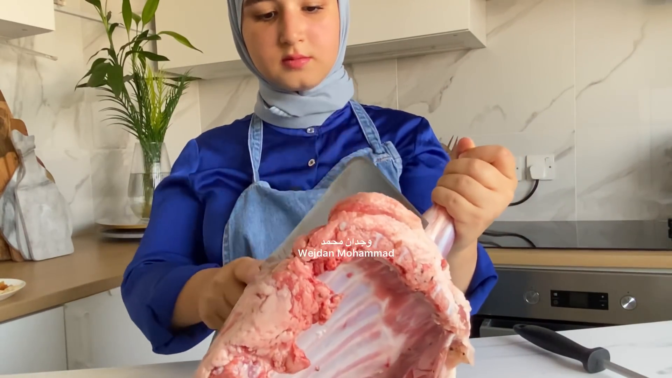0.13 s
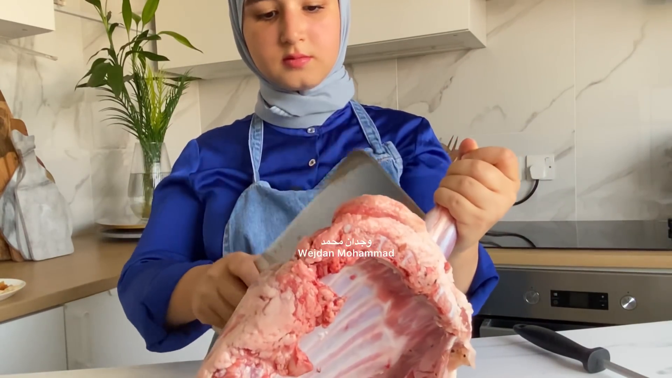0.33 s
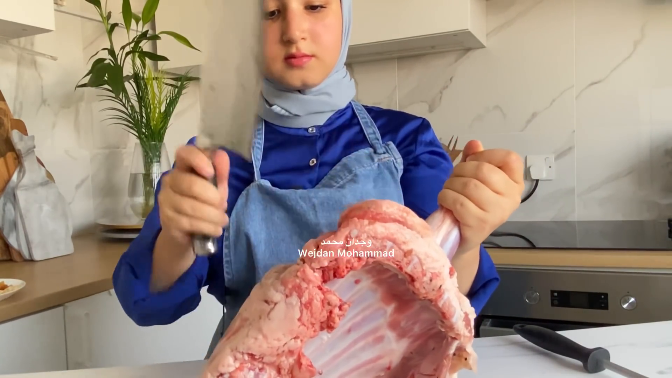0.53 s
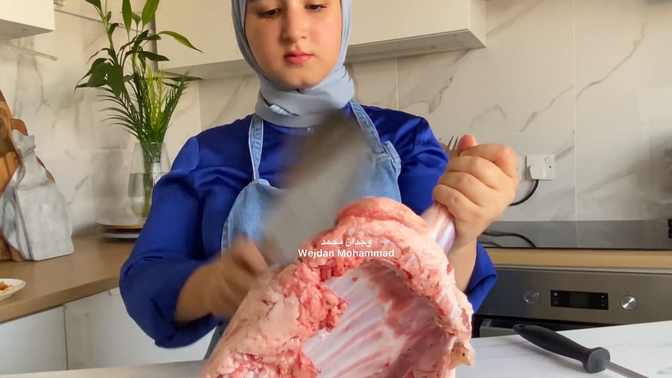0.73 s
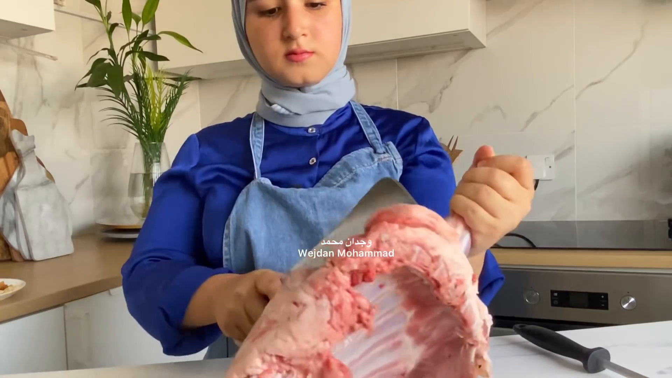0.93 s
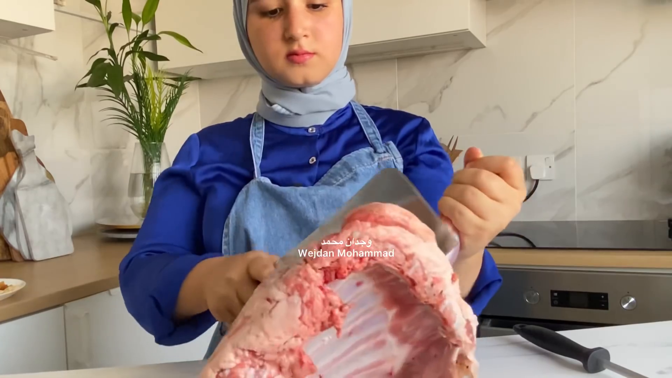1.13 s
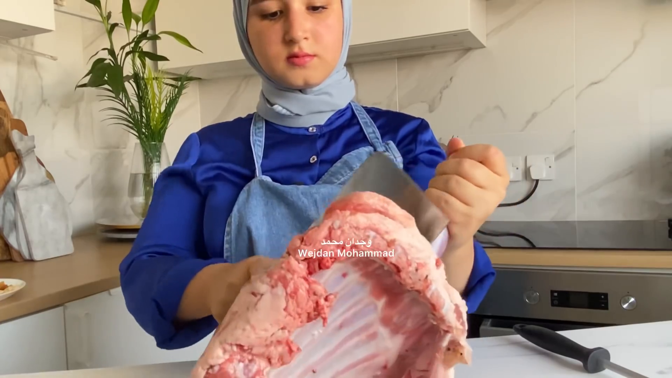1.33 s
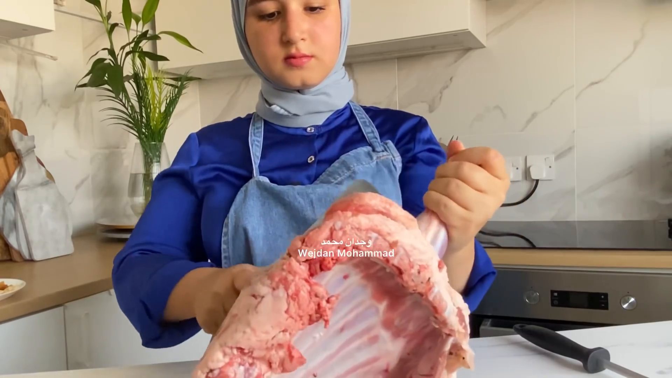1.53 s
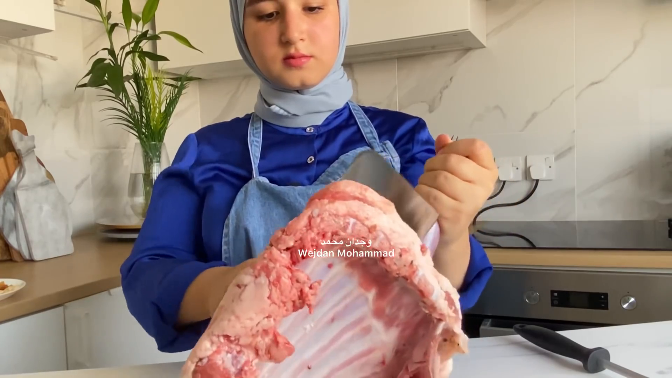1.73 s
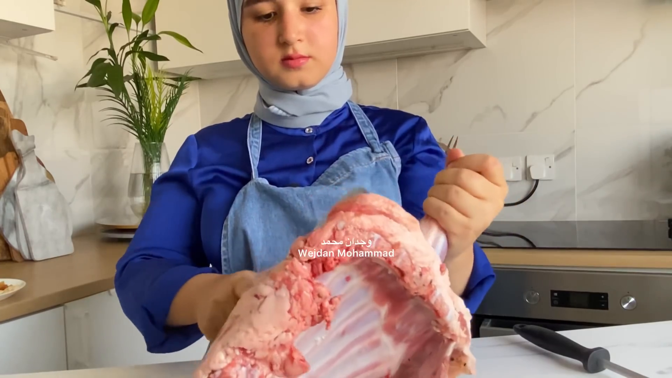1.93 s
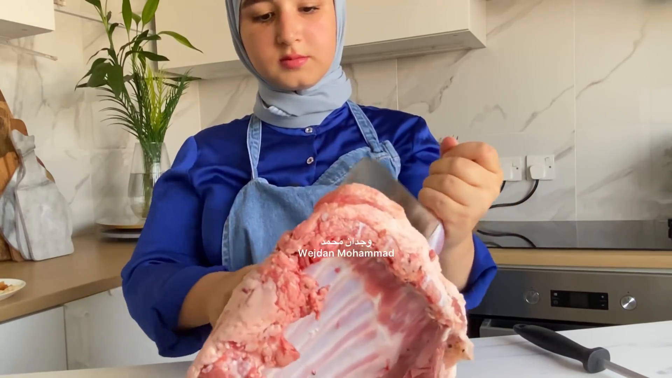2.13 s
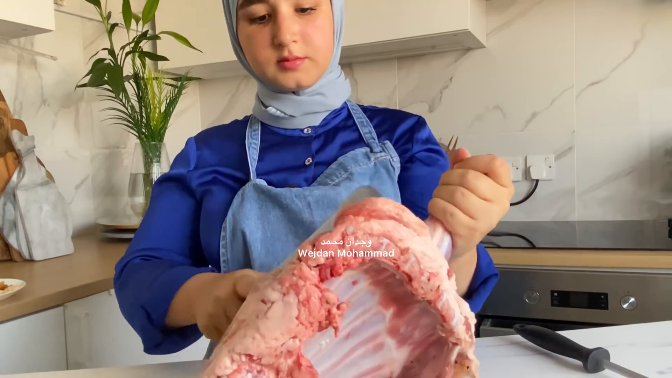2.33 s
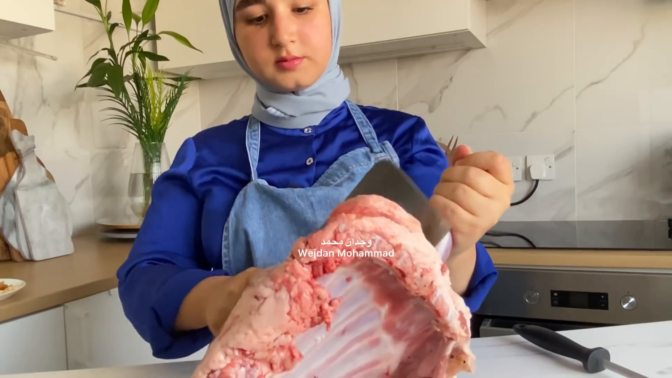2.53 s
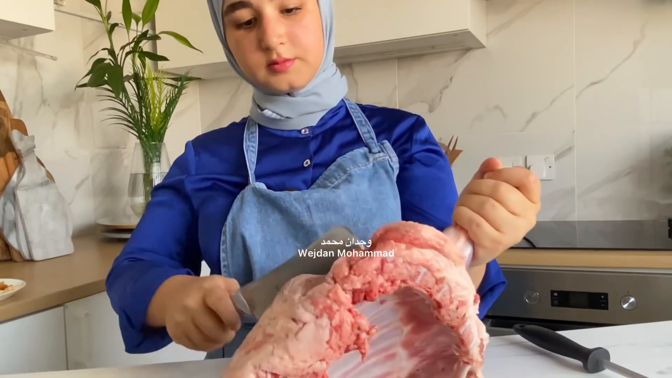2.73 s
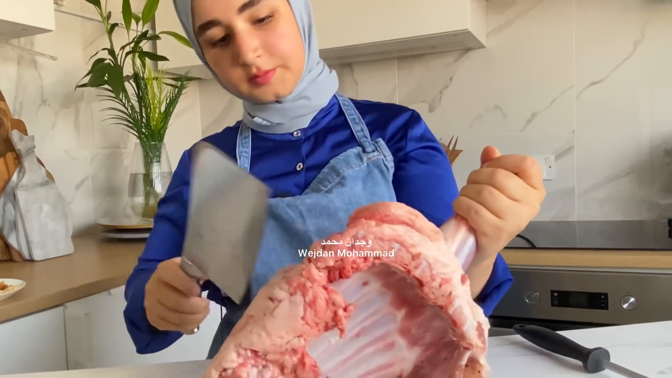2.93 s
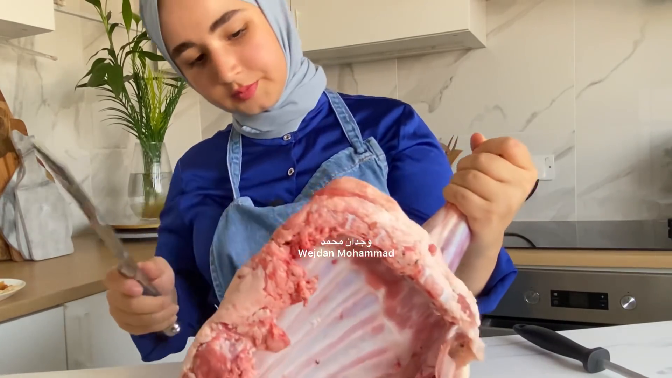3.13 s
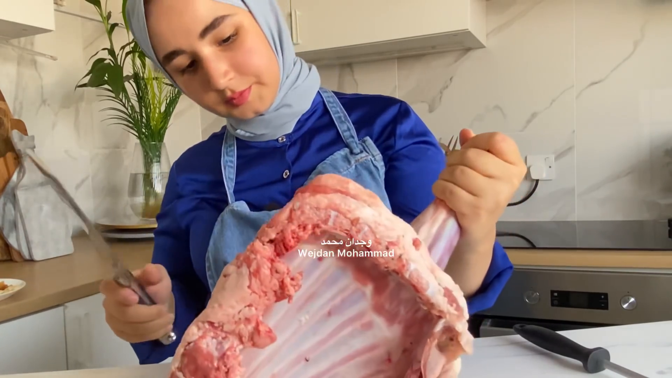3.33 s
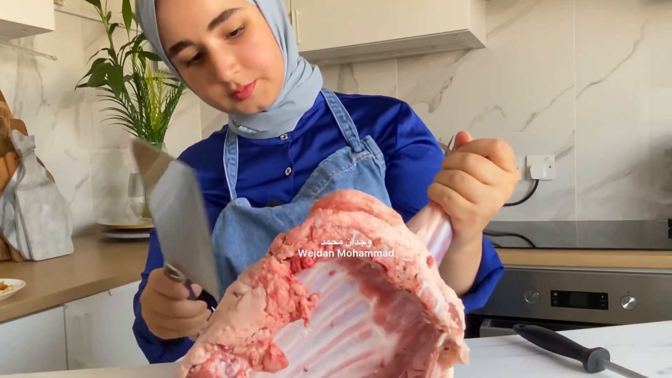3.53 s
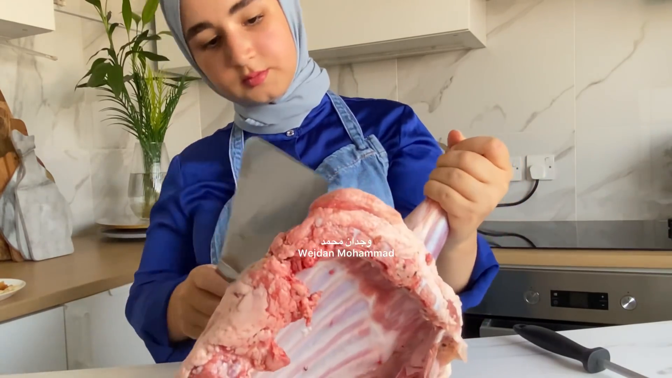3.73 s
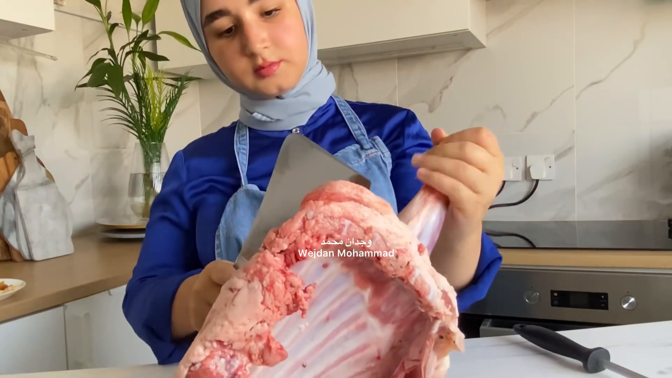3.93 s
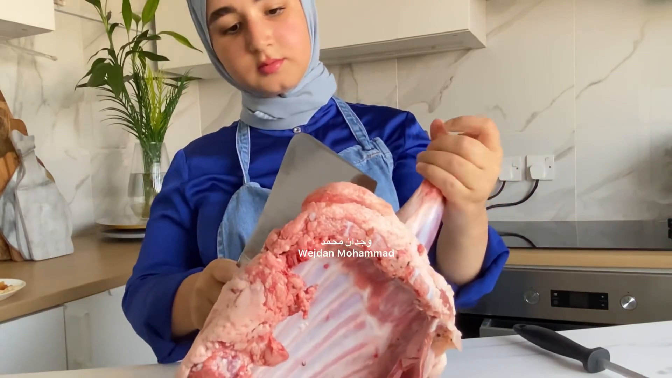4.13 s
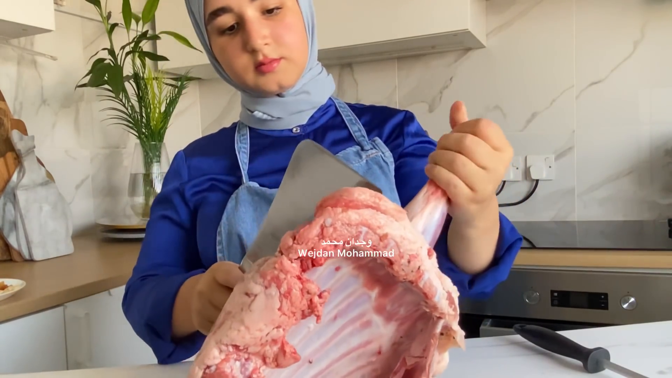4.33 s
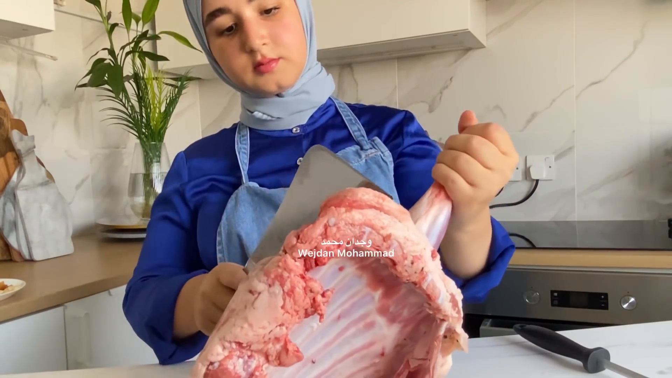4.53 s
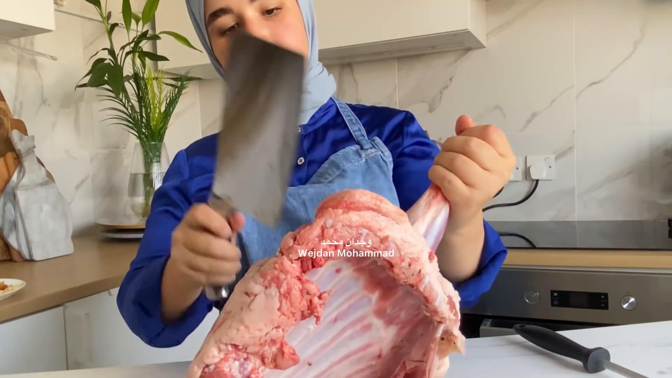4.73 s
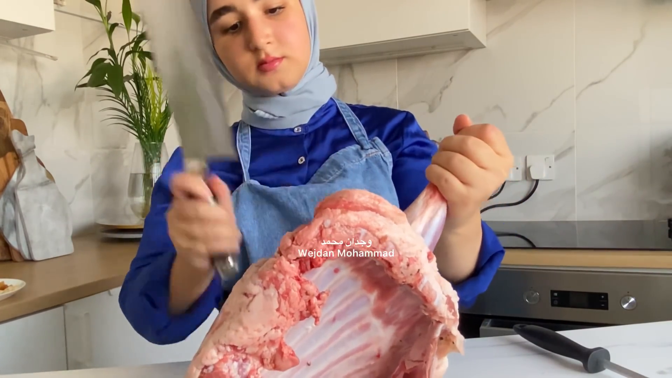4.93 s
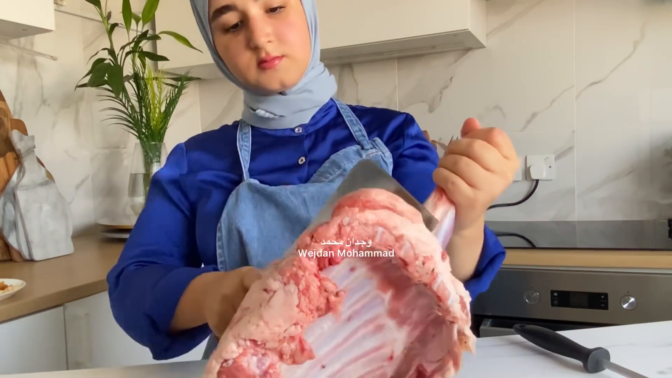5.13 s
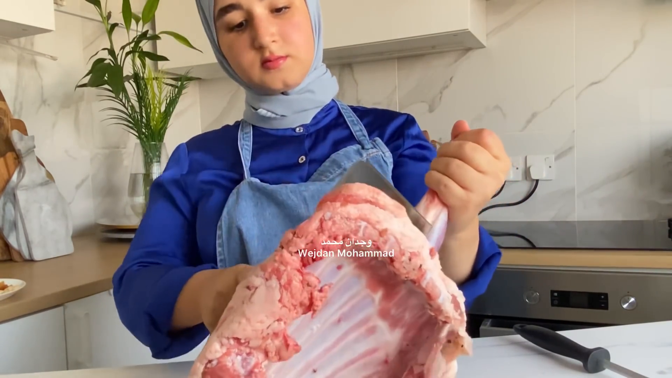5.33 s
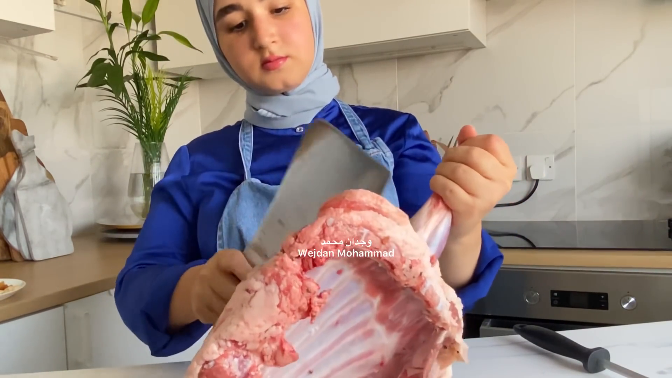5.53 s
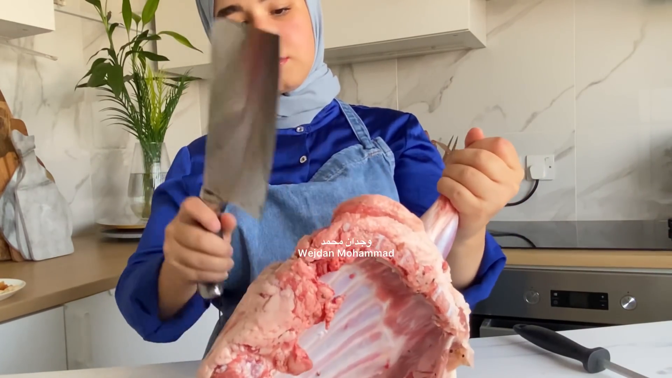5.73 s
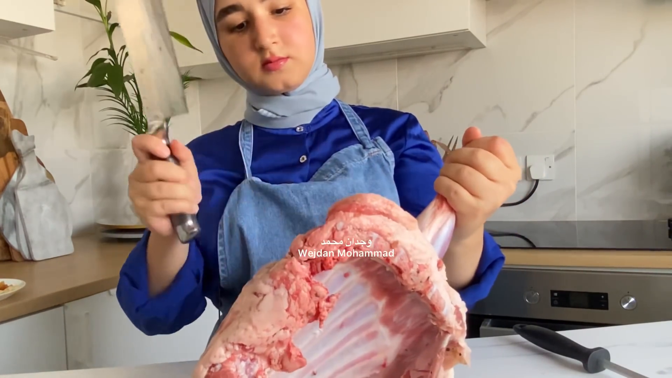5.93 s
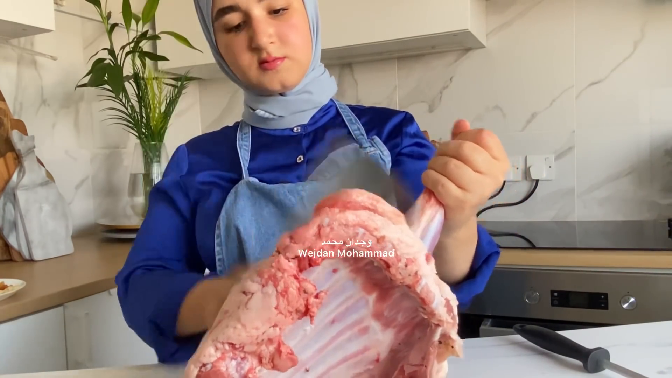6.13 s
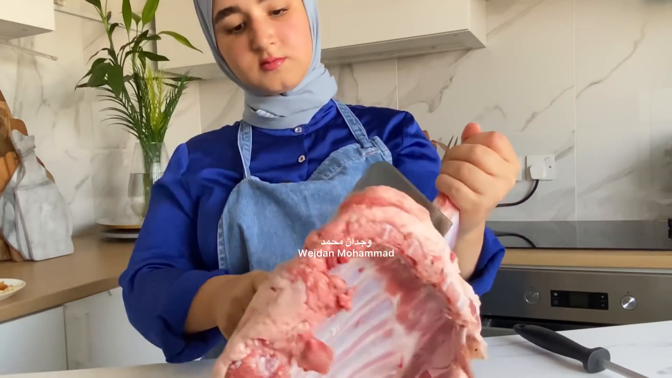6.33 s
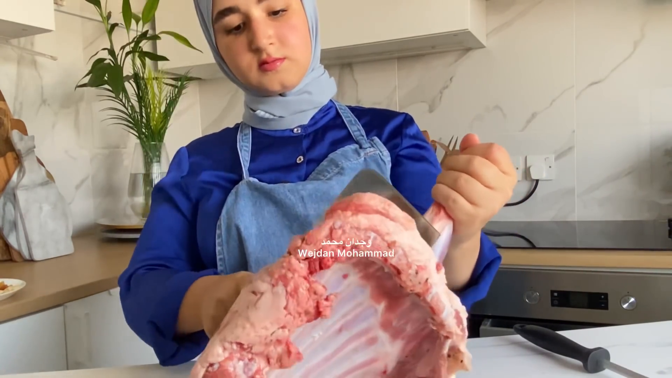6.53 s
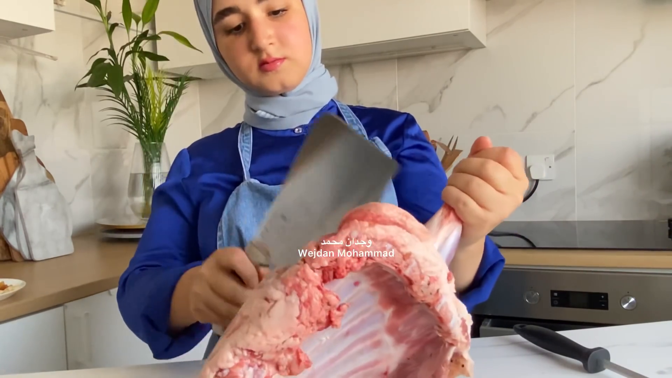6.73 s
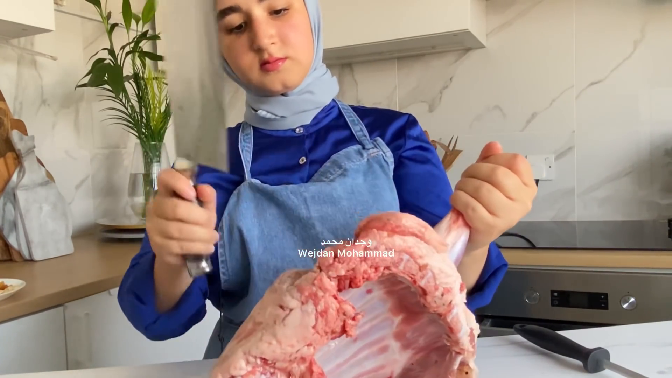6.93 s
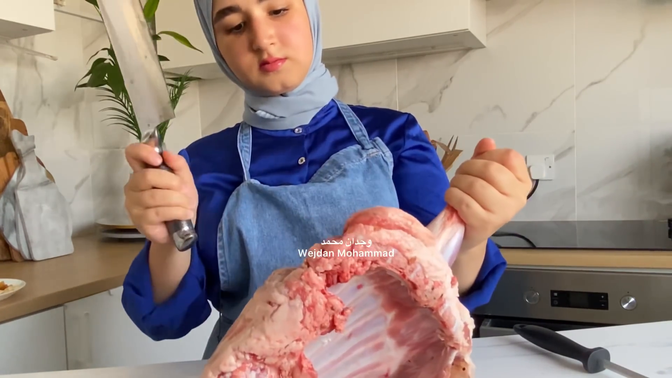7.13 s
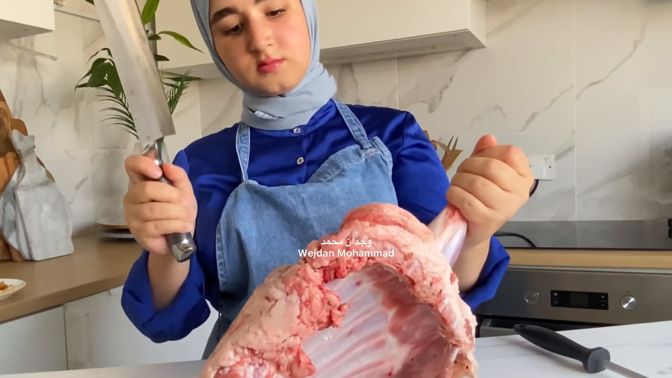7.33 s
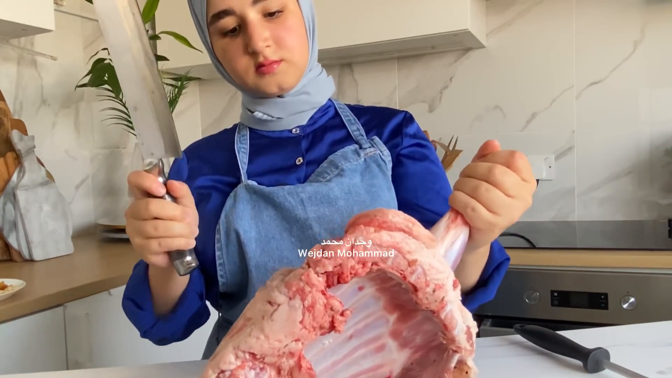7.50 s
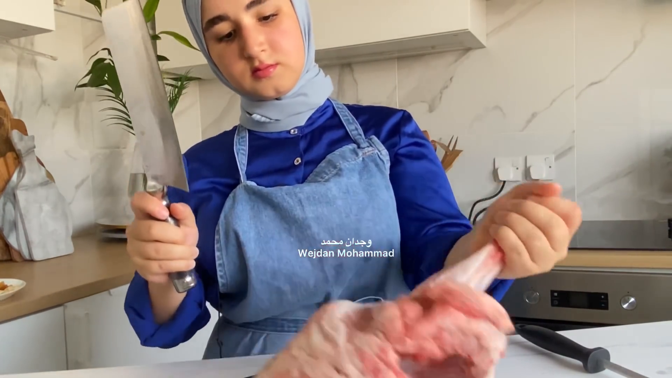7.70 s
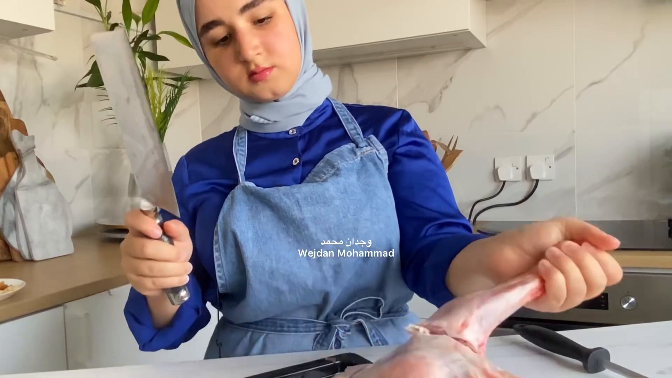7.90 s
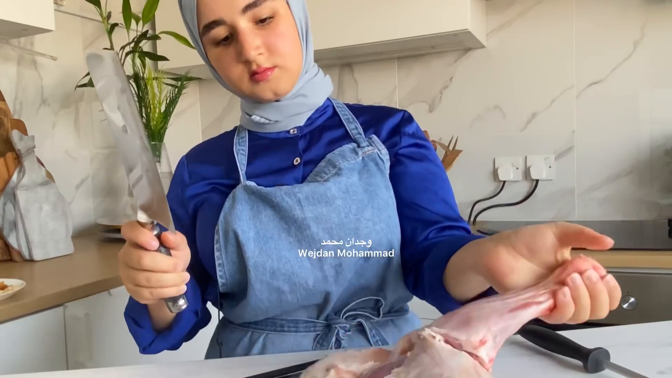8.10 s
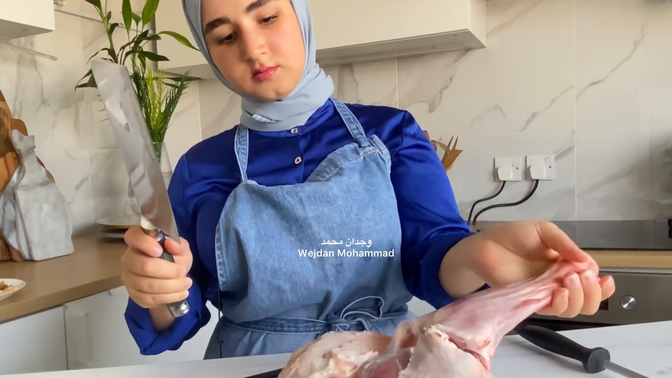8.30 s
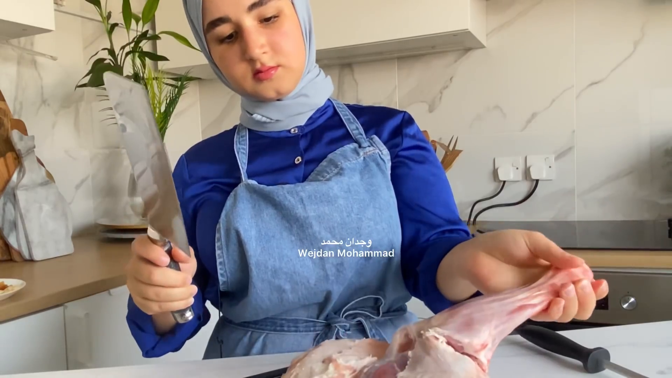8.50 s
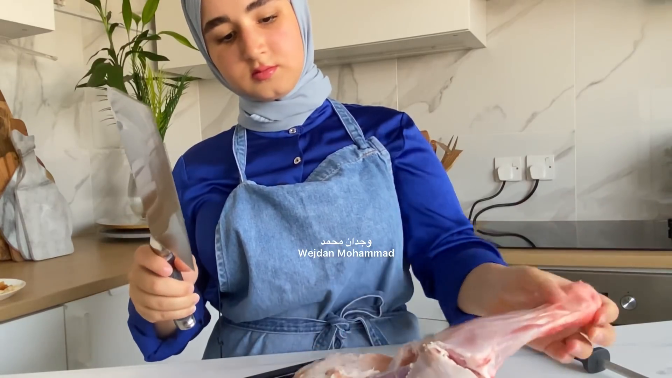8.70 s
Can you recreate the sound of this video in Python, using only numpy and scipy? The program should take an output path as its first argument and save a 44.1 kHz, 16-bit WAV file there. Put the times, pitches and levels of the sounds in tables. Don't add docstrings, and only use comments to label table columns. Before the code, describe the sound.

Close, overloaded chopping: one very loud crunch of blade into bone, with a hollow board slap and low boom, then several seconds of faint blade scraping and moist meat movement. Two harder, splintering chops follow, the last with a brighter metallic ring. Soft sticky ticks and sliding meat end the scene. A fridge hum, thin hiss and low rumble continue throughout, with short reflections from hard kitchen walls.

```python
import sys
import numpy as np
from scipy import signal
from scipy.fft import rfft, irfft
from scipy.io import wavfile
from scipy.ndimage import uniform_filter1d

SR = 44100
rng = np.random.default_rng(int(sys.argv[2]) if len(sys.argv) > 2 else 0)


def level_to_linear(level):
    exponent = np.asarray(level, float) / 20
    return 10 ** exponent


def to_wav(sig):
    pcm = np.clip(np.atleast_2d(sig), -1, 1) * 32767
    pcm = np.round(pcm).astype(np.int16)
    wavfile.write(sys.argv[1], SR, pcm.T)


N = 386302


def at_hz(points, hz):
    table_hz, value = np.array(points).T
    return np.interp(np.log(hz + 1), np.log(table_hz), value)


def in_time(rows, column):
    rows = np.array(rows)
    return np.interp(np.arange(N) / SR, rows[:, 0], rows[:, column], left=-120, right=-120)


def rms_one(x):
    return x / np.sqrt(np.mean(x ** 2) + 1e-20)


def energy_one(x):
    return x / np.sqrt(np.sum(x ** 2))


def band(x, low_hz, high_hz):
    sos = signal.butter(2, [low_hz, min(high_hz, SR * .45)], "band", fs=SR, output="sos")
    return signal.sosfilt(sos, x)


def dying(count, t60):
    return level_to_linear(-60 * np.arange(count) / SR / t60)


def add(out, s, sound):
    at = round(s * SR)
    out[at:at + len(sound)] += sound[:N - at]


def coloured(spectrum, count):
    hz = np.fft.rfftfreq(count, 1 / SR)
    white = rng.standard_normal(count)
    return rms_one(irfft(rfft(white) * level_to_linear(at_hz(spectrum, hz)), count))


def wander(low_hz, high_hz):
    return rms_one(band(rng.standard_normal(N + SR), low_hz, high_hz)[SR:])


def grains(per_s, spread_db):
    sizes = level_to_linear(spread_db * np.minimum(rng.exponential(1, N), 5)) * rng.choice([-1, 1], N)
    return rms_one(sizes * (rng.random(N) < per_s / SR))


def ring(push, modes):
    out = 0
    for hz, db, t60 in modes:
        r = level_to_linear(-60 / (t60 * SR))
        w = 2 * np.pi * hz / SR
        resonator = [1, -2 * r * np.cos(w), r * r]
        out = out + level_to_linear(db) * signal.lfilter([0, np.sin(w)], resonator, push + 1e-18)
    return out


def impact(spectrum, count):
    hz = np.fft.rfftfreq(count, 1 / SR)
    cepstrum = irfft(np.log(level_to_linear(at_hz(spectrum, hz))), count)
    cepstrum[1:count // 2] *= 2
    cepstrum[count // 2 + 1:] = 0
    return rms_one(irfft(np.exp(rfft(cepstrum)), count)) / np.sqrt(count)


# start_s, crunch_db, crunch_t60_s, worktop_thud_db, edge_entry_db
BLOWS = [
    (0.7674, 12, 0.016, -8, -12.5),
    (5.019, 21, 0.011, -6.5, -17),
    (6.1549, 21.5, 0.022, -5.5, -23),
]
# frequency_hz, density_db_per_hz
CRUNCH_RIB = [(40, -5), (118, 3), (160, 3), (400, -4.5), (640, 0), (1330, -7.5), (2200, -6.5),
              (3500, -12.5), (7000, -20), (9000, -25.5), (16000, -19)]
CRUNCH_JOINT = [(40, -5.5), (120, 2.5), (300, -4), (560, 0), (1280, -11.5), (1800, -7), (3200, -14),
                (5400, -16.5), (8500, -27), (12000, -18), (16000, -28)]
CRUNCH_SPINE = [(40, -6.5), (170, 1.5), (320, -4.5), (500, -2), (1300, -9), (2100, -5), (4400, -15.5),
                (5500, -13), (7500, -19.5), (11000, -25.5), (16000, -32.5)]
# pitch_hz, level_db, t60_s
RING_RIB = [(383, -11.5, 0.023), (535, -18, 0.057), (680, -14.5, 0.022), (1810, -6.5, 0.015),
            (4456, -8, 0.008), (2357, -13.5, 0.022), (2900, -19.5, 0.015)]
RING_JOINT = [(260, -10, .05), (544, -13, .025), (904, -18, .05), (1810, -7, .022), (2600, -13, .015),
              (3200, -11, .015), (5450, -13, .012), (6900, -13, .008)]
RING_SPINE = [(1780, -9, .015), (2280, -11, .04), (3200, -13, .02), (5330, -8, .025), (5450, -10, .03),
              (5400, -38, .45), (5510, -38, .5), (5560, -7, .03), (6280, -6, .04)]
# pitch_hz, level_db, t60_s
WORKTOP = [(28, 0.5, 0.14), (81.5, -1.5, 0.34), (117, 0, 0.29), (195.4, -10, 0.39), (253.7, -5.5, 0.087)]
# start_s, level_db, board_ring_db
REBOUNDS = [
    (0.7891, 21, -8.5),
    (5.036, 13.5, -18),
    (6.17, 6.5, -14),
]
# pitch_hz, level_db, t60_s
BOARD = [(323.8, -15.5, .08), (541.3, 1.5, 0.091), (605.4, -3.5, 0.23), (649, 1.5, 0.22),
         (723, -6.5, 0.055), (898, -11, 0.065)]


def blows():
    close, wide = np.zeros(N), np.zeros(N)
    count, entry_count = 16384, 200
    click = np.eye(1, count)[0]
    crunches = [CRUNCH_RIB, CRUNCH_JOINT, CRUNCH_SPINE]
    rings = [RING_RIB, RING_JOINT, RING_SPINE]
    for blow, colour, modes, rebound in zip(BLOWS, crunches, rings, REBOUNDS):
        s, crunch_db, t60, thud_db, entry_db = blow
        back_s, back_db, board_db = rebound

        entry = coloured(colour, count)[:entry_count] * np.linspace(.25, 1, entry_count)
        add(close, s - entry_count / SR, level_to_linear(entry_db) * entry)

        splinters = energy_one(rng.standard_normal(count) * dying(count, t60))
        knock = impact(colour, count)
        crunch = signal.fftconvolve(splinters, knock)[:count]
        add(close, s, level_to_linear(crunch_db + 9) * crunch)

        blade = level_to_linear(-6) * ring(click, modes)
        add(wide, s, level_to_linear(crunch_db) * knock + blade)
        add(close, s, level_to_linear(16.5) * blade)

        push = signal.lfilter([.01], [1, -.99], click)
        add(close, s + .0055, -level_to_linear(thud_db) * ring(push, WORKTOP))

        add(wide, back_s, level_to_linear(back_db) * band(knock, 40, 7000))
        board = level_to_linear(board_db) * ring(click, BOARD)
        add(close, back_s, board)
        add(wide, back_s, level_to_linear(-12) * board)
    return close + wide, wide


# start_s, length_s, scrape_db, wet_rustle_over_scrape_db
STROKES = [(1.323, 0.14, -53, -17), (1.53, 0.16, -57, -17), (1.746, 0.14, -54, -12),
           (1.93, 0.12, -54.5, -22), (2.128, .15, -57, -9), (2.32, 0.15, -56, -16),
           (2.506, 0.22, -52.5, -17), (2.788, 0.16, -60, 0), (2.932, 0.19, -58, -4), (3.1, 0.26, -64, -8),
           (3.808, 0.039, -59, -18), (3.932, 0.04, -68, -6), (3.98, .04, -66, -6), (4.93, 0.073, -72, 6),
           (6.635, .04, -60, 0), (7.69, 0.057, -68, 0), (7.765, 0.11, -59.5, -17), (8.351, .03, -72, -2),
           (3.52, 0.38, -79, 8)]


def stroke_levels():
    t, scrape, wet = np.arange(N) / SR, np.zeros(N), np.zeros(N)
    rise, fall, depth_db = .23, .4, 15
    for s, length, db, wet_db in STROKES:
        part = (t - s) / length
        pace = np.clip(np.minimum(part / rise, (1 - part) / fall), -5, 1)
        gain = level_to_linear(db - depth_db * (1 - pace) ** 1.9)
        scrape += gain
        wet += level_to_linear(wet_db) * gain
    return scrape, wet


# pitch_hz, level_db, t60_s
BLADE = [(1930, 5, 0.037), (4430, 2, .02), (4900, 0, .02), (5490, -1, 0.015), (5940, -1, 0.016),
         (6370, -1, .025), (7000, -3.5, .02), (7770, -9, .025), (8950, -11, .02), (9600, -11.5, .02),
         (10200, -11, .02), (11400, -16, .015)]
# time_s, contact_db, drag_over_contact_db
CONTACT = [(1.1, -90, 8), (1.2, -72.5, 9.5), (3.35, -82, 15), (3.42, -84, 4), (3.5, -72, -5),
           (4.2, -67.5, 6), (4.9, -75, 11), (5.0, -89, 13), (6.6, -90, 8.5), (6.7, -72, 15),
           (6.85, -81.5, 15), (7.55, -80, 10), (7.75, -71, 12.5), (8.5, -77, 8), (8.62, -65, 10.5),
           (8.76, -65.5, 13)]


def sawing():
    grit, catch = grains(3700, 2.8), wander(4, 25)
    patchy_db = .5 * catch
    linger = rms_one(uniform_filter1d(catch, size=2000))
    modes = 0
    for mode in BLADE:
        caught_db = 6 * np.roll(linger, round(mode[0] * 9))
        modes = modes + ring(grit * level_to_linear(caught_db), [mode])

    rub = rms_one(rms_one(band(grit, 4000, 6800)) + level_to_linear(-10) * rms_one(band(grit, 4700, 11000)))
    scrape = rms_one(rms_one(modes) + level_to_linear(-5 + patchy_db) * rub)
    rustle = rms_one(band(band(grains(6000, 3), 11500, 15000), 9000, 15500))
    slide = rms_one(band(grains(3000, 2.3), 800, 2500))

    stroke, wet = stroke_levels()
    contact = level_to_linear(in_time(CONTACT, column=1))
    drag = level_to_linear(np.maximum(in_time(CONTACT, column=2), -30))
    rustle_gain = level_to_linear(-6 + np.roll(patchy_db, SR)) * wet + level_to_linear(-6) * contact
    slide_gain = level_to_linear(-6) * stroke + drag * contact
    return stroke * scrape + contact * rub + rustle_gain * rustle + slide_gain * slide


# start_s, peak_db
DULL_TICKS = [(1.2354, -46), (1.6394, -67), (3.4594, -51), (3.8202, -54), (3.8202, -44), (3.9529, -47),
              (4.5794, -50), (5.435, -37.5), (6.6268, -41), (7.7718, -43), (7.7894, -46), (7.888, -52),
              (8.0994, -54.5)]
# start_s, peak_db
BRIGHT_TICKS = [(1.1702, -63), (1.6861, -54), (1.8447, -45), (2.2694, -56), (3.459, -55), (3.8194, -56),
                (3.8794, -66), (3.9454, -48), (3.9554, -50), (3.9968, -43), (4.0604, -58), (4.2752, -50),
                (4.4294, -61), (4.4672, -53), (4.5194, -57), (4.5481, -53), (4.5794, -56), (4.7386, -56),
                (6.6268, -43), (7.6196, -61), (7.72, -60.5), (7.7643, -47), (7.8394, -59), (7.9488, -53),
                (8.0581, -51.5), (8.1025, -51), (6.647, -47), (8.3584, -55), (8.7141, -50)]


def sticky_ticks():
    out, count = np.zeros(N), 600
    for events, hz in [(DULL_TICKS, 6200), (BRIGHT_TICKS, 12500)]:
        for s, db in events:
            burst = rng.standard_normal(count) * dying(count, .006)
            tick = band(burst, hz * .8, hz * 1.2)
            add(out, s, level_to_linear(db + 2.5) * tick / np.abs(tick).max())
    return out


# start_s, peak_db, centre_hz
KNOCKS = [(0.099, -28.5, 123), (0.514, -23, 245), (1.233, -24.5, 227), (1.63, -25.5, 206),
          (2.029, -29, 238), (2.395, -27, 169), (3.808, -30.5, 192), (4.041, -32, 292), (4.577, -25, 257),
          (4.665, -30, 227), (4.766, -29, 131), (6.539, -34, 139.2)]


def soft_knocks():
    out = np.zeros(N)
    push = signal.lfilter([.1], [1, -.9], np.eye(1, 4096)[0])
    for s, db, hz in KNOCKS:
        knock = ring(push, [(hz, 0, .05), (hz * 1.7, -3, .04), (hz * .6, -3, .05)])
        add(out, s, level_to_linear(db - 2) * knock)
    return out


# time_s, level_db
WEIGHT = [(1.2, -68), (1.35, -57), (3.0, -47), (3.5, -52.5), (3.68, -42), (3.85, -56), (4.05, -59),
          (4.9, -56), (5.0, -85), (7.4, -79.5), (7.55, -48), (8.4, -54), (8.76, -43.5)]


def rolling_weight():
    shift = rms_one(band(grains(600, 2.8), 150, 630))
    return level_to_linear(in_time(WEIGHT, column=1) - 3.5) * shift


# frequency_hz, t60_s
ROOM_T60 = [(60, 0.4), (250, 0.42), (1000, 0.54), (3000, 0.54), (7000, 0.44), (14000, 0.29)]


def kitchen(x):
    count, build_s, echo = SR, .0081, 0
    white = rng.standard_normal((2, count))
    edges = 30 * 2 ** np.arange(0, 9.6, .5)
    for k, (low, high) in enumerate(zip(edges, edges[1:])):
        t60 = at_hz(ROOM_T60, np.sqrt(low * high))
        echo = echo + band(white[k % 2], low, high) * dying(count, t60)
    echo = echo * (1 - np.exp(-(np.arange(count) / SR / build_s) ** 2))
    return signal.fftconvolve(x, energy_one(echo))[:N]


# pitch_hz, rms_db
HUM = [(57.8, -56), (86.1, -48.5), (166.9, -51.5), (290.7, -54.5), (403.7, -51), (522.2, -59), (576.0, -60),
       (866.7, -52.5), (899.0, -61), (1098, -65), (1270, -62.5), (1384, -72), (1502, -72.5), (1561, -64),
       (1733, -66), (2309, -67), (2331, -65), (2449, -67.5), (2541, -70), (2681, -73.5), (3235, -73),
       (3348, -72.5), (3580, -75), (4910, -73.5)]


def fridge():
    t, waver = np.arange(N) / SR, wander(.59, 5)
    hum = np.zeros(N)
    for hz, db in HUM:
        level_db = db + 1.5 + .39 * np.roll(waver, round(hz * 50))
        hum += level_to_linear(level_db) * np.sin(2 * np.pi * (hz * t + rng.random()))
    return hum


# frequency_hz, density_db_per_hz
AIR = [(26, -30.5), (45, 0.5), (141, -5), (171, -5), (371, -11), (405, -7.5), (434, -11), (585, -8.5),
       (817, -18), (877, -14.5), (974, -17.5), (1290, -20.5), (3000, -28), (3900, -62), (6600, -120)]
# frequency_hz, density_db_per_hz
HISS = [(1760, -23), (3000, -15.5), (3480, -5), (3750, -8.5), (4730, -9), (5880, -8), (7000, -12.5),
        (8000, -20.5), (13700, -22), (16000, -29)]


def room_noise():
    return level_to_linear(-43) * coloured(AIR, N) + level_to_linear(-62.5) * coloured(HISS, N)


# peak_s, level_db
JOLTS = [(.17, -41), (.77, -21), (1.46, -33), (1.92, -33), (2.3, -42), (2.98, -44), (3.89, -30),
         (4.19, -41.5), (4.65, -31.5), (5.02, -18), (5.64, -49.5), (6.169, -18.5), (6.54, -35), (6.78, -54),
         (7.3, -60.5), (8.7, -41)]


def rumble():
    level, count = np.full(N, level_to_linear(-37.5)), SR
    rise_s, t60_s = .03, .59
    swell = (1 - np.exp(-np.arange(count) / SR / rise_s)) * dying(count, t60_s)
    for s, db in JOLTS:
        add(level, s - rise_s, level_to_linear(db) * swell / swell.max())
    return level * rms_one(band(wander(9.5, 20), 4.8, 27))


def scene():
    hits, wide = blows()
    handling = sawing() + sticky_ticks() + soft_knocks() + rolling_weight()
    echo = level_to_linear(4.5) * kitchen(wide + level_to_linear(-15) * handling)
    background = fridge() + room_noise() + rumble()
    return (hits + handling + echo + background)[None]


def band_limit(x):
    return signal.sosfilt(signal.butter(12, 16290, fs=SR, output="sos"), x)


def record(dry):
    knee, ceiling, cutoff_hz = 12, .95, 15900
    clipped = dry / (1 + np.abs(dry / ceiling) ** knee) ** (1 / knee)
    cut = signal.sosfilt(signal.cheby2(10, 22, cutoff_hz, fs=SR, output="sos"), clipped)
    return band_limit(cut)


dry = scene()
out = record(dry)
to_wav(out)
```